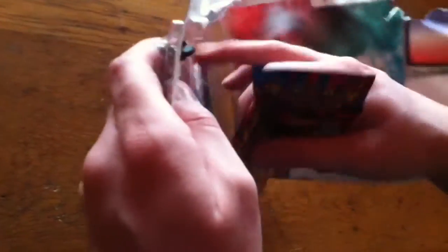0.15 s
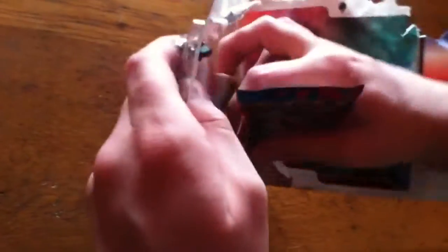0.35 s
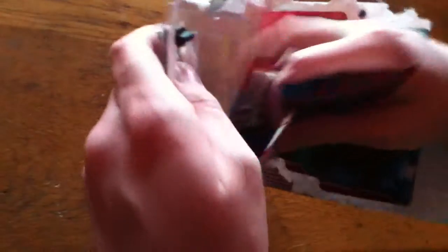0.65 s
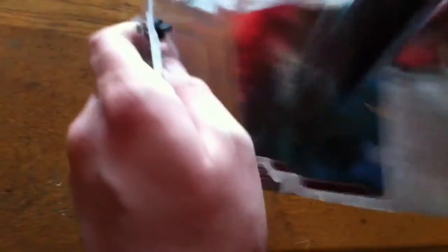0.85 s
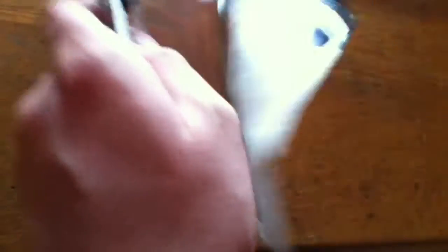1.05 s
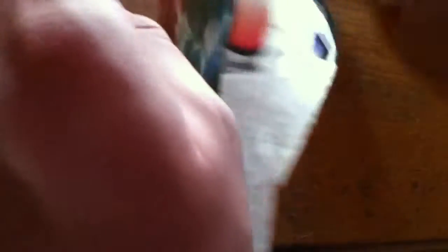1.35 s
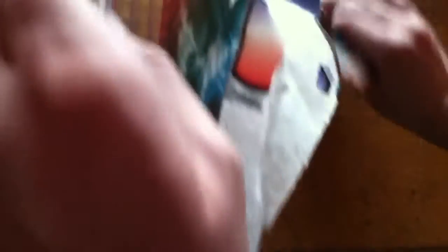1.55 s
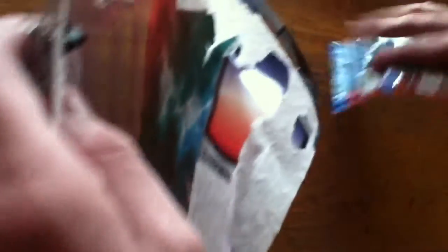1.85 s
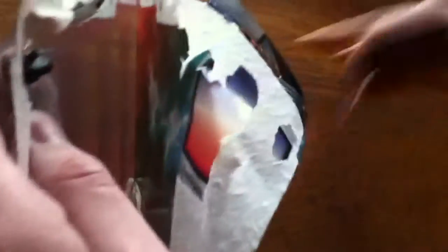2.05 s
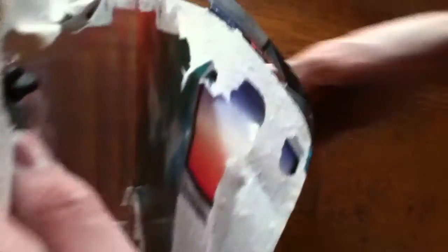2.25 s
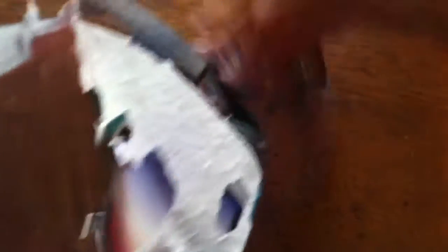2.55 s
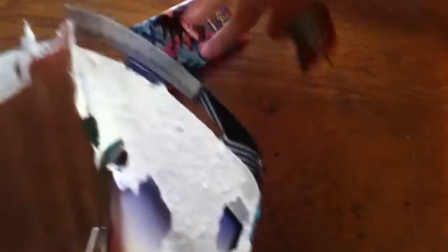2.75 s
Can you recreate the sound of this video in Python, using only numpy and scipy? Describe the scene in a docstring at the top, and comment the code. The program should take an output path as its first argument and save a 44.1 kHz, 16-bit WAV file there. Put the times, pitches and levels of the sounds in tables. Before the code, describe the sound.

A plastic blister pack is pulled open close by, snapping and popping over a fine rustle for the first second, with light knocks on a wooden table. The cardboard backing rips quickly around 0.9 to 1.2 seconds, then tears slowly with more cracks from 1.5 to 1.9. From 2.3 a foil packet slides out with a hiss, and near 2.7 a finger judders softly over the wood.

```python
"""At a wooden table in a small room, a plastic blister pack is pulled open by hand, up close.
The shell buckles in sharp snaps and hollow pops over a fine rustle. The card backing rips in two pulls,
a crackle of tiny fractures, and the pack bumps the table. Then a foil packet slides out with a hiss
of friction and a finger judders softly over the wood. The room adds a short tail and a low murmur."""
import sys
import numpy as np
from scipy import signal
from scipy.fft import rfft, irfft, next_fast_len
from scipy.io import wavfile
from scipy.ndimage import uniform_filter1d

SR = 44100
rng = np.random.default_rng(int(sys.argv[2]) if len(sys.argv) > 2 else 0)


def to_wav(s):
    """Save 16-bit WAV."""
    ch = np.atleast_2d(s).T  # columns
    pcm = np.round(np.clip(ch, -1, 1) * 32767)  # PCM
    wavfile.write(sys.argv[1], SR, pcm.astype(np.int16))


N = 127890

SHELL_ATTACK_S = 0.00022
# tone of the card, torn slowly or brushed: freq_hz, gain_db
CARD_EQ = [(180, -42), (300, -19), (731, -15), (953, -3.5), (1300, -7), (1780, -2), (4570, -2.5),
           (8140, 1.5), (12900, -12.5), (15500, -23)]


def snaps():
    """Each buckle is one sharp crack, a few milliseconds of chatter and a short ring of the thin shell."""
    # buckles: start_s, body_db (near 2 kHz), bite_db (near 5 kHz), edge_db (near 10 kHz)
    buckles = [(0.0623, -46, -39.5, -45), (.1746, -41.5, -34, -57), (.208, -32.5, -25, -37),
               (0.2234, -32.5, -24, -19), (0.2273, -25.5, -26, -17.5), (0.3101, -38.5, -30, -45),
               (0.316, -33, -21.5, -21.5), (0.369, -36, -33, -37), (0.3952, -44, -33.5, -32),
               (0.4023, -26.5, -25, -21.5), (0.42, -47, -29, -46), (0.4546, -37, -33.5, -36),
               (0.551, -39, -42, -41.5), (0.5784, -33, -26.5, -27), (0.6026, -37, -36.5, -34.5),
               (0.665, -33.5, -32, -32), (0.6729, -34, -34, -37), (0.704, -28, -26.5, -31.5),
               (0.722, -36, -34, -26.5), (.778, -41, -28.5, -27), (0.896, -44, -42, -28),
               (0.9296, -53, -28, -25.5), (1.086, -57, -56, -52), (1.103, -42, -31, -22.5),
               (1.191, -46, -43, -38), (1.577, -33, -27.5, -21.5), (1.651, -47, -33, -24.5),
               (1.6632, -31.5, -36, -31.5), (1.8064, -24, -27.5, -30.5), (1.8176, -34, -39, -47),
               (2.0695, -51, -39.5, -36.5), (2.2438, -48, -42.5, -62), (2.4979, -48, -22.5, -34)]
    # one curve each for body, bite and edge: freq_hz, gain_db
    bands = [
        [(1100, -34), (1900, -2), (3000, -2.5), (3700, -13), (6000, -27)],
        [(2400, -84), (3700, -4.5), (4700, -1), (6500, 2), (8200, -19)],
        [(5500, -29), (7500, 2), (10000, 1.5), (11500, -7), (15500, -15.5)],
    ]
    crack_share, ring_db = .3, -12.5
    out, t = np.zeros(N), np.arange(SR // 10) / SR
    attack = 1 - np.exp(-t / SHELL_ATTACK_S)
    envelope = attack * (decay(t, t60_s=0.0067) + amp(ring_db) * decay(t, t60_s=0.038))
    for start_s, *levels in buckles:
        for level_db, band in zip(levels, bands):
            crack = np.sqrt(crack_share) * click(band, len(t), size=110)
            chatter = np.sqrt(1 - crack_share) * burst(band, envelope, size=110)
            add(out, start_s - t.mean(), amp(level_db) * crack)
            add(out, start_s, amp(level_db) * chatter)
    return out


def pops():
    """A face of the shell flips over and rings hollow around one pitch; a few of these hits are knocks that
    ring at one pitch too."""
    # pitched hits, shell flips and a few knocks: start_s, pitch_hz, level_db
    pitched_hits = [(0.0453, 2180, -42.5), (.316, 4610, -21.5), (0.764, 2630, -37.5), (0.9405, 1710, -32.5),
                    (0.9448, 617, -36.5), (1.1034, 6260, -16.5), (1.1055, 2060, -31.5), (1.1159, 2615, -21),
                    (1.451, 2900, -28.5), (1.5605, 3360, -24.5), (1.614, 1044, -37), (1.8178, 2420, -27.5)]
    # chatter around the ring: pitch_ratio, gain_db
    chatter_eq = [(.4, -28.5), (.8, -6), (1, 3), (1.25, -12), (2.4, -26), (4, -38)]
    out, t = np.zeros(N), np.arange(SR // 10) / SR
    envelope = (1 - np.exp(-t / SHELL_ATTACK_S)) * decay(t, t60_s=0.022)
    for start_s, pitch_hz, level_db in pitched_hits:
        chatter = burst([(pitch_hz * ratio, db) for ratio, db in chatter_eq], envelope, size=110)
        ring = np.sin(2 * np.pi * pitch_hz * t) * envelope
        add(out, start_s, amp(level_db) * (amp(-2) * chatter + ring))
    return out


def card():
    """Fingers work the pack; its backing rips fast and the card lifts, then it tears slowly, and the flap's
    rasp shifts pitch."""
    # envelopes of the fast rip with the card's lift after it, the slow tear and the finger rustle: time_s,
    # level_db
    rip_curve = [(.845, -59), (.875, -29.5), (.896, -21.5), (.907, -41), (.938, -37), (.96, -79),
                 (1.035, -74), (1.045, -41.5), (1.062, -40.5), (1.08, -49), (1.1, -82), (1.12, -35),
                 (1.16, -51.5), (1.22, -54.5)]
    tear_curve = [(1.447, -44), (1.454, -36.5), (1.495, -53.5), (1.508, -29.5), (1.527, -38),
                  (1.562, -30.5), (1.595, -31.5), (1.617, -31.5), (1.635, -36.5), (1.665, -33.5),
                  (1.70, -42), (1.80, -37.5), (1.82, -29.5), (1.85, -42), (1.878, -40), (1.94, -55)]
    rustle_curve = [(0, -51), (.10, -45.5), (.155, -55.5), (.176, -36), (.195, -50), (.225, -38.5),
                    (.30, -59), (.325, -54), (.37, -52.5), (.42, -42), (.535, -51), (.56, -46.5),
                    (.65, -49.5), (.77, -41), (.81, -52), (.86, -42), (.98, -86)]
    # tone of the rip and the rustle: freq_hz, gain_db
    rip_eq = [(300, -7.5), (1200, -11), (1800, 1.5), (3000, -2), (4800, -8), (6200, -0.5), (9600, 0.5),
              (15500, -26)]
    rustle_eq = [(240, -34), (400, -5), (900, -0.5), (1280, -5.5), (1880, 0), (3360, -5.5), (3850, -1),
                 (5150, -1.5), (9790, -3.5), (15500, -23)]
    # the torn flap's main resonance: time_s, pitch_hz
    flap_sweep = [(0.883, 3360), (.892, 6200), (1.2, 5900), (1.45, 2740), (1.70, 3150), (1.76, 6700),
                  (1.83, 2440)]
    rip = stroke(rip_curve, rip_eq, grains_per_s=1400, scatter_db=4.5)
    tear = stroke(tear_curve, CARD_EQ, grains_per_s=600, scatter_db=1.5)
    rustle = stroke(rustle_curve, rustle_eq, grains_per_s=300, scatter_db=4)
    return rustle + resonance(rip + tear, flap_sweep, contrast_db=5.5, width_octaves=0.15)


def foil_packet():
    """The foil packet slides out; its hiss peaks higher with speed and sinks as it slows."""
    # envelope of the slide: time_s, level_db
    slide_curve = [(2.1, -63), (2.275, -57), (2.287, -34.5), (2.35, -42.5), (2.39, -36), (2.43, -30.5),
                   (2.58, -31), (2.63, -37), (2.69, -44.5), (2.75, -45.5), (2.785, -75), (2.865, -59),
                   (2.875, -41.5), (2.9, -38)]
    # tone of the foil: freq_hz, gain_db
    foil_eq = [(400, -23), (650, -21.5), (1300, -17), (1700, -8.5), (3000, -5.5), (3400, -13), (4000, -6.5),
               (6400, -1.5), (9800, -4), (12000, -11), (15500, -24.5)]
    # the foil's main resonance: time_s, pitch_hz
    foil_sweep = [(2.33, 6500), (2.42, 11100), (2.52, 6500), (2.72, 5800)]
    hiss = stroke(slide_curve, foil_eq, grains_per_s=830, scatter_db=5.5, hiss_db=4)
    return resonance(hiss, foil_sweep, contrast_db=4, width_octaves=.17)


def bumps():
    """The pack knocks the table: the card clacks, the wood thuds and hums at its lowest mode."""
    # knocks: start_s, thud_db, clack_db, t60_s
    knocks = [(.100, -46, -41, 0.066), (0.111, -51, -68, 0.064), (.209, -53, -41.5, 0.036),
              (0.27, -74, -46.5, 0.066), (0.507, -57, -39, 0.054), (.764, -59, -45, 0.064),
              (.897, -44, -42.5, 0.083), (1.042, -58, -51.5, 0.078), (1.45, -54, -46.5, 0.063),
              (1.553, -50.5, -56, 0.058), (1.612, -69, -45, 0.053), (1.662, -61, -51, 0.016),
              (1.807, -60, -38.5, 0.089), (1.817, -36, -36, 0.041), (2.296, -51.5, -47.5, 0.045)]
    # tone of the wood and the card: freq_hz, gain_db
    thud_eq = [(80, -9.5), (125, -7), (180, 1), (240, 5.5), (350, -15.5), (700, -45)]
    clack_eq = [(180, -65), (380, 3), (500, 2), (680, 0.5), (880, 3.5), (1300, -9), (1800, -5),
                (4000, -26.5)]
    table_hz, attack_s = 127.9, 0.00061
    out, t = np.zeros(N), np.arange(SR // 3) / SR
    hum = amp(-6.5) * np.sin(2 * np.pi * table_hz * t) * decay(t, t60_s=0.61)
    for start_s, thud_db, clack_db, t60_s in knocks:
        envelope = (1 - np.exp(-t / attack_s)) * decay(t, t60_s)
        thud = burst(thud_eq, envelope, size=600) + hum
        clack = burst(clack_eq, envelope, size=400)
        add(out, start_s, amp(thud_db) * thud + amp(clack_db) * clack)
    # the knocks carry no deep bass
    low_cut = signal.butter(N=3, Wn=86.5, btype="high", fs=SR, output="sos")
    return signal.sosfilt(low_cut, out)


def scuffs():
    """Fingertips brush the card."""
    # brushes: centre_s, level_db
    brushes = [(1.987, -46.5), (2.19, -43), (2.213, -48.5)]
    return soft_pulses(brushes, CARD_EQ, width_s=0.0055)


def hand():
    """The hand nudges the table, and later a finger judders over it."""
    # touches on the wood: centre_s, level_db
    nudges = [(.965, -50.5), (1.203, -51.5), (1.25, -55)]
    judders = [(2.706, -47.5), (2.746, -47), (2.766, -50), (2.795, -46.5), (2.837, -48), (2.869, -46)]
    # their dull tones: freq_hz, gain_db
    nudge_eq = [(45, -2), (130, 7), (260, -22)]
    judder_eq = [(100, -12), (220, -3.5), (430, -3), (560, -16.5)]
    return soft_pulses(nudges, nudge_eq, width_s=0.012) + soft_pulses(judders, judder_eq, width_s=0.0037)


def room_reverb(x):
    """A short tail that changes as the pack moves about."""
    # the room's decay: freq_hz, t60_s
    decay_times = [(120, 0.45), (700, 0.3), (7000, 0.22), (14000, 0.087)]
    out, predelay_s = np.zeros(N), .003
    for part in np.array_split(np.arange(N), 10):
        hz, t, bins = signal.stft(rng.standard_normal(SR // 2), SR, nperseg=256)
        tail = signal.istft(bins * decay(t, along(decay_times, hz)[:, None]), SR, nperseg=256)[1]
        add(out, part[0] / SR + predelay_s, signal.fftconvolve(x[part], tail / np.linalg.norm(tail)))
    return out


def room_tone():
    """The room's own steady, low murmur."""
    # tone of the murmur: freq_hz, gain_db
    murmur_eq = [(50, -2), (125, 0.5), (240, 2), (400, -5.5), (1000, -14), (3000, -18.5), (8000, -17.5),
                 (15000, -24)]
    return amp(-58) * noise(murmur_eq, N)


def stroke(curve, eq, grains_per_s, scatter_db, hiss_db=0):
    """Tiny fractures or slips at random times, on a hiss of friction, under a level curve."""
    chance, sizes = rng.random(N), rng.standard_normal(N)
    grains = (chance < grains_per_s / SR) * amp(scatter_db * np.clip(sizes, -2, 2))
    grain_decay = decay(np.arange(SR // 100) / SR, t60_s=0.0024)
    crackle = signal.fftconvolve(grains, grain_decay)[:N] * rng.standard_normal(N)
    hiss = amp(hiss_db) * rng.standard_normal(N)
    texture = unit(recolour(colour(unit(crackle) + hiss, eq), flexing))
    level_db = np.interp(np.arange(N) / SR, *np.transpose(curve), left=-120, right=-120)
    return texture * amp(level_db)


def flexing(hz, t, depth_db=3):
    """A flexing sheet keeps changing colour: random gains a few hundred hertz wide, some 50 ms long."""
    field = rng.standard_normal((len(hz), len(t)))
    return depth_db * unit(uniform_filter1d(uniform_filter1d(field, size=3, axis=0), size=18, axis=1))


def resonance(x, sweep, contrast_db, width_octaves):
    """x through one peak that glides along (time_s, pitch_hz) points."""
    def gain_db(hz, t):
        octaves_away = np.log2((hz + 1) / np.interp(t, *np.transpose(sweep)))
        return contrast_db * (np.exp(-.5 * (octaves_away / width_octaves) ** 2) - .5)
    return recolour(x, gain_db)


def soft_pulses(pulses, eq, width_s):
    """Puffs of noise that swell and fade without a click."""
    out, t = np.zeros(N), np.arange(SR // 10) / SR
    bell = np.exp(-.5 * ((t - t.mean()) / width_s) ** 2)
    for centre_s, level_db in pulses:
        puff = unit(noise(eq, len(t)) * bell) * np.sqrt(np.mean(bell ** 2))
        add(out, centre_s - t.mean(), amp(level_db) * puff)
    return out


def click(eq, length, size):
    """One coloured spike in the middle of length samples, as strong as size samples of rms 1."""
    x = colour(signal.unit_impulse(length, "mid"), eq)
    return x * np.sqrt(size / np.sum(x ** 2))


def burst(eq, envelope, size):
    """Enveloped noise with rms 1 over its first size samples."""
    x = noise(eq, len(envelope)) * envelope
    return x / np.sqrt(np.mean(x[:size] ** 2))


def noise(eq, size):
    """Coloured noise of rms 1."""
    return unit(colour(rng.standard_normal(size), eq))


def colour(x, eq):
    """x shaped by (freq_hz, gain_db) points, rolling off beyond both ends."""
    padded = next_fast_len(len(x) + 4096)
    hz = np.fft.rfftfreq(padded, 1 / SR)
    rolloff = np.minimum(1, hz / eq[0][0]) ** 2 / np.maximum(1, hz / eq[-1][0]) ** 2
    return irfft(rfft(x, padded) * amp(along(eq, hz)) * rolloff, padded)[:len(x)]


def recolour(x, gain_db):
    """x through a moving EQ, gain_db(hz, t)."""
    hz, t, bins = signal.stft(x, SR, nperseg=256)
    return signal.istft(bins * amp(gain_db(hz[:, None], t)), SR, nperseg=256)[1][:N]


def along(points, hz):
    """Interpolate (freq_hz, value) points on a log frequency axis."""
    freqs, values = np.transpose(points)
    return np.interp(np.log(hz + 1), np.log(freqs + 1), values)


def amp(db):
    return 10 ** (np.asarray(db) / 20)


def unit(x):
    return x / np.sqrt(np.mean(x ** 2) + 1e-20)


def decay(t, t60_s):
    return np.exp(-np.log(1000) * t / t60_s)


def add(out, start_s, x):
    """Mix x into out from start_s."""
    i = max(0, round(start_s * SR))
    out[i:i + len(x)] += x[:max(0, len(out) - i)]


def scene():
    """The pack with its reverb, the hand on the table and the room tone, in mono."""
    pack = snaps() + pops() + bumps() + card() + scuffs() + foil_packet()
    return (pack + amp(-13) * room_reverb(pack) + hand() + room_tone())[None]


def record(dry):
    """A brick-wall high cut takes off the very top."""
    cutoff_hz, padded = 15900, next_fast_len(N + SR // 2)
    passband = np.fft.rfftfreq(padded, 1 / SR) < cutoff_hz
    return irfft(rfft(dry, padded) * passband, padded)[..., :N]


dry = scene()
out = record(dry)
to_wav(out)
```